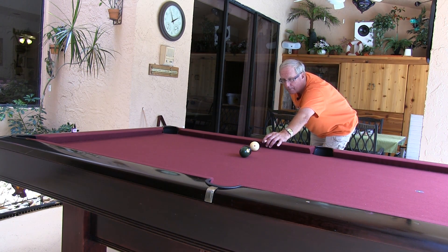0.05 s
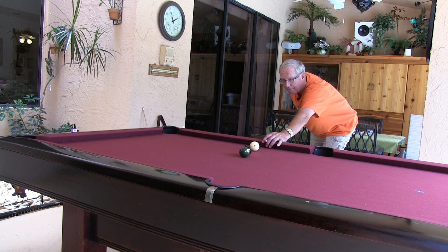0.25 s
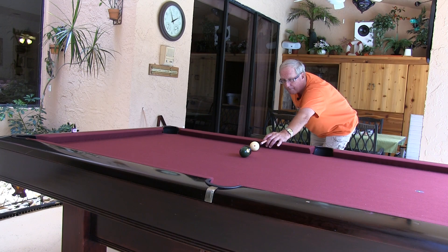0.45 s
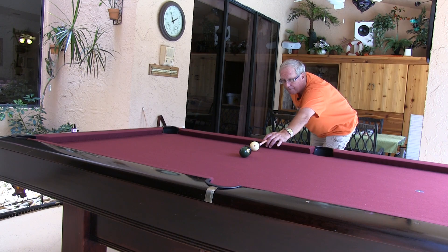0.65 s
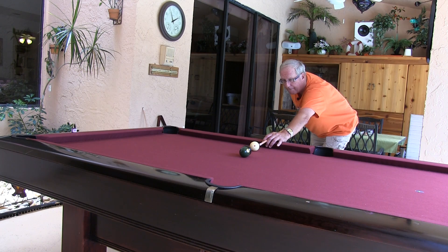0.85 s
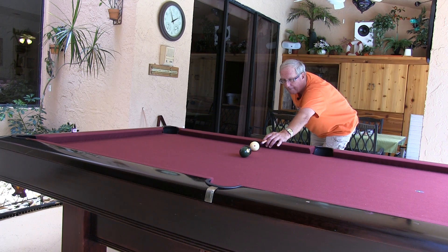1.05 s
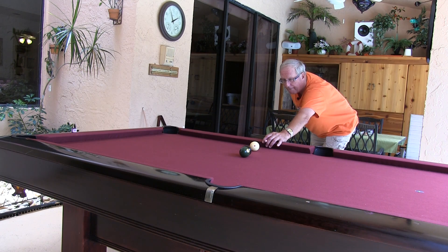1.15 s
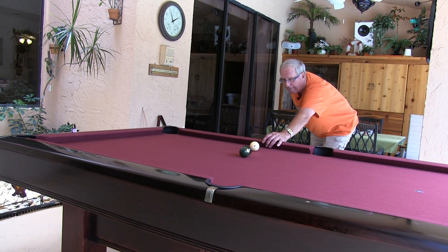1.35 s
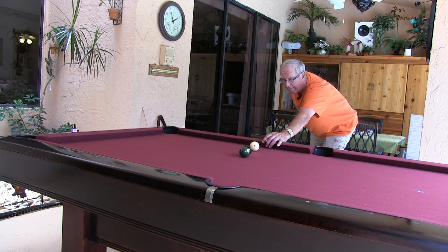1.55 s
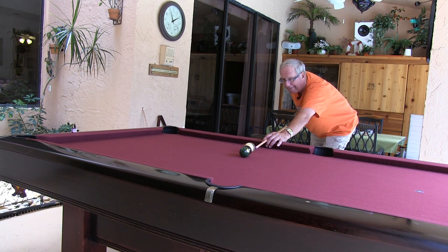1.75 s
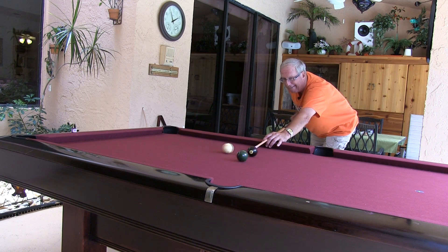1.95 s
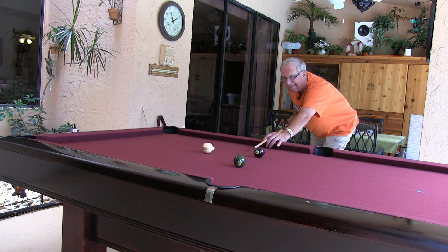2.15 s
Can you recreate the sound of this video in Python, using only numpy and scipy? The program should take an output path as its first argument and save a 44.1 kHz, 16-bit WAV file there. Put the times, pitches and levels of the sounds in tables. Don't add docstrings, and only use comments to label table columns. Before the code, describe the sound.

A pool cue strikes a ball with a woody knock, then two billiard balls click sharply together.

```python
import sys
import numpy as np
from scipy import signal
from scipy.fft import rfft, irfft
from scipy.io import wavfile
from scipy.ndimage import uniform_filter1d

SR = 44100
rng = np.random.default_rng(int(sys.argv[2]) if len(sys.argv) > 2 else 0)


def generate_wav(signal):
    frames = np.transpose(np.atleast_2d(signal))
    scaled = np.clip(frames, -1, 1) * 32767
    pcm = np.round(scaled).astype(np.int16)
    wavfile.write(sys.argv[1], SR, pcm)


def invert_db(level):
    return 10 ** (np.asarray(level, dtype=float) / 20)


N = 96182
T = np.arange(N) / SR
BANDS_HZ = 18 * 2 ** np.arange(0, 10, .4)

# frequency in Hz, density in dB per Hz.
RUMBLE = [(20, 0), (45, 3.5), (75, 5), (120, -2), (220, -9.5), (300, -29), (500, -47.5)]
# frequency in Hz, density in dB per Hz.
TRAFFIC = [(250, -0.5), (400, -4), (850, 0.5), (1400, -2.5), (2000, -8), (2600, -17.5), (5000, -19.5),
           (9000, -47)]
# frequency in Hz, density in dB per Hz.
HISS = [(10, 17), (25, 10.5), (100, 6.5), (400, 2.5), (1500, -0.5), (7000, -1.5), (12000, -3), (15300, -8)]
# start in seconds, length in seconds, level in dB.
SLIDES = [
    (1.35, 0.13, -60),
    (1.522, .11, -60.5),
    (1.734, 0.066, -69),
]
# start in seconds, signed size, pitch in Hz, length in cycles.
TIP_CHATTER = [
    (1.8303, -.05, 4900, 3.0),
    (1.8304, -.035, 8300, 4.0),
    (1.83247, -.25, 4300, 2.8),
    (1.8326, .02, 8600, 4.0),
    (1.8352, -.05, 4700, 3.0),
    (1.8385, .012, 4500, 3.0),
    (1.8421, .02, 4500, 3.0),
]
# frequency in Hz, level in dB, T60 in seconds.
SHAFT_MODES = [(193, -22, 0.66), (269.4, -22, 0.46), (347.5, -19.5, 0.42), (382, -13, 0.27),
               (421.3, -9.5, 0.33), (477, -9, 0.29), (582, -2, 0.075), (619, 2, 0.034), (720, 2.5, 0.027),
               (978, -9, 0.14), (1257, -14.5, 0.09), (1654, -19, 0.13), (1822, -10.5, 0.079),
               (2310, -11, 0.025)]
# frequency in Hz, level in dB.
FERRULE_RATTLE = [(900, -32), (1500, -4), (3000, 0), (4800, -1), (6200, -17), (12000, -30)]
# frequency in Hz, T60 in seconds.
PATIO_T60 = [(100, .9), (300, .7), (1000, .52), (2200, .48), (3500, .4), (6000, .3), (12000, .15)]
# frequency in Hz, level in dB.
CUE_RETURN = [(100, 2), (250, -0.5), (500, 2), (950, -1.5), (1250, -34), (1850, -13), (2500, -25.5),
              (5000, -27), (9000, -47)]
# frequency in Hz, level in dB.
CLICK_RETURN = [(150, -13), (400, -11.5), (800, -3), (1400, -2.5), (2400, 1.5), (3300, -5.5), (4200, -24),
                (8000, -43)]
# arrival in seconds, signed size.
CLICK = [
    (1.94014, .6),
    (1.94059, .58),
]
# frequency in Hz, level in dB, T60 in seconds.
CLOTH_BOUNCE = [(2250, 0, .0017), (2900, -24, .012), (7340, -26, .002)]
# frequency in Hz, gain in dB.
CLICK_COLOUR = [(3000, 0.5), (4200, -13), (5800, -4), (7400, 3), (10000, -7), (16000, -7)]
# arrival in seconds, signed size.
ECHOES = [
    (1.94165, -.17),
    (1.9446, -.22),
    (1.94495, .1),
    (1.9462, .06),
    (1.9530, -.22),
    (1.9548, .12),
    (1.9563, .15),
    (1.9570, .12),
    (1.9604, .14),
]

CUE_S, BOUNCE_S = 1.8303, 1.94099


def curve(table, hz):
    rows = np.array(table, float)
    return np.interp(np.log(hz), np.log(rows[:, 0]), rows[:, 1])


def bins_hz(x):
    return np.arange(len(x) // 2 + 1) * SR / len(x) + 1e-3


def colour(x, table):
    return irfft(rfft(x) * invert_db(curve(table, bins_hz(x))), len(x))


def coloured_noise(table):
    return colour(rng.standard_normal(N), table)


def band(x, hz):
    steps = np.log2(bins_hz(x) / hz) / .4
    return irfft(rfft(x) * np.cos(np.pi / 2 * np.clip(steps, -1, 1)) ** 2, len(x))


def level(x, db):
    return x * invert_db(db) / np.sqrt(np.mean(x ** 2))


def walk(rate_hz):
    k = int(SR / rate_hz)
    held = np.repeat(rng.standard_normal(N // k + 1), k)
    return 1.3 * uniform_filter1d(uniform_filter1d(held, k), k)[:N]


def since(start):
    return np.maximum(T - start, 0)


def decay(age, t60):
    return np.exp(-np.log(1000) * age / t60)


def ring(start, hz, t60):
    age = since(start)
    return np.sin(2 * np.pi * hz * age) * decay(age, t60)


def air(table, db, swell_db, flicker_db):
    noise, swell = coloured_noise(table), walk(0.54)
    out = np.zeros(N)
    for hz in BANDS_HZ:
        out += band(noise, hz) * invert_db(swell_db * swell + flicker_db * walk(5.73))
    return level(out, db)


def slides():
    swell = np.zeros(N)
    for start, length, db in SLIDES:
        stroke = np.clip((T - start) / length, 0, 1)
        swell += invert_db(db) * np.sqrt(np.abs(np.sin(np.pi * stroke)))
    brush = [(2500, -14), (4500, 0), (6500, -10), (16000, -30)]  # Hz, dB
    return swell * invert_db(1.5 * walk(60)) * level(coloured_noise(brush), 0)


def shaft():
    age, wobble_db, bloom_share = since(CUE_S), 2, 0.067
    body = np.zeros(N)
    for hz, db, t60 in SHAFT_MODES:
        waver = wobble_db * walk(50) * np.minimum(age / 0.011, 1)
        bloom = 1 - np.exp(-age * hz / 400 / (bloom_share * t60))
        body -= invert_db(db + waver) * ring(CUE_S, hz, t60) * bloom
    push = np.hanning(int(0.00026 * SR) + 2)
    return invert_db(-16.5) * np.convolve(body, push / push.sum())[:N]


def ferrule():
    age = since(CUE_S)
    out = level(coloured_noise(FERRULE_RATTLE), -33) * (age > 0) * decay(age, 0.036)
    for start, size, hz, cycles in TIP_CHATTER:
        turn = np.clip((T - start) * hz, 0, cycles)
        out += size * np.sin(2 * np.pi * turn) * np.sin(np.pi * turn / cycles) ** 1.3
    return out


def room(start, returned, db):
    noise, age = coloured_noise(returned), since(start)
    gap_s, rise_s, grain_db = 0.0046, 0.014, 2
    tail = np.zeros(N)
    for hz in BANDS_HZ:
        tail += band(noise, hz) * invert_db(grain_db * walk(70)) * decay(age, curve(PATIO_T60, hz))
    return invert_db(db) * tail * (1 - np.exp(-np.maximum(age - gap_s, 0) / rise_s))


def contacts(table):
    contact_s = .00042
    force = np.zeros(N)
    for start, size in table:
        force += size * np.sin(np.pi * np.clip((T - start) / contact_s, 0, 1)) ** 1.8
    return np.gradient(force) * contact_s * SR / np.pi


def balls():
    out = contacts(CLICK)
    for hz, db, t60 in CLOTH_BOUNCE:
        out += invert_db(db) * ring(BOUNCE_S, hz, t60)
    return colour(out, CLICK_COLOUR)


def echoes():
    return colour(contacts(ECHOES), [(3800, 0), (7600, -30)])


def scene():
    left = air(RUMBLE, -37.5, .3, .5) + air(TRAFFIC, -47.5, .4, .5)
    left += slides()
    left += shaft() + ferrule() + room(CUE_S, CUE_RETURN, -11)
    left += balls() + echoes() + room(BOUNCE_S, CLICK_RETURN, -11)
    return np.array([left, 0 * left])


def roll_off(x):
    return signal.sosfilt(signal.butter(12, 15850, fs=SR, output="sos"), x)


def record(dry):
    hiss = np.array([level(coloured_noise(HISS), db) for db in (-63, -61.5)])
    hiss = signal.sosfilt(signal.ellip(10, .2, 60, 15850, fs=SR, output="sos"), hiss)
    return roll_off(dry + hiss)


dry = scene()
out = record(dry)
generate_wav(out)
```